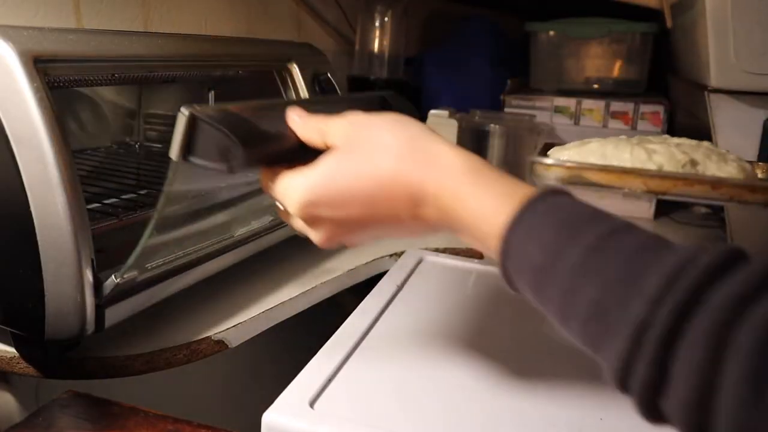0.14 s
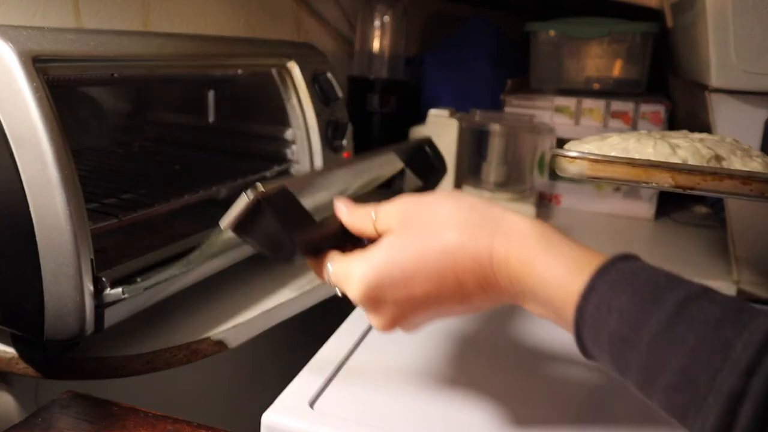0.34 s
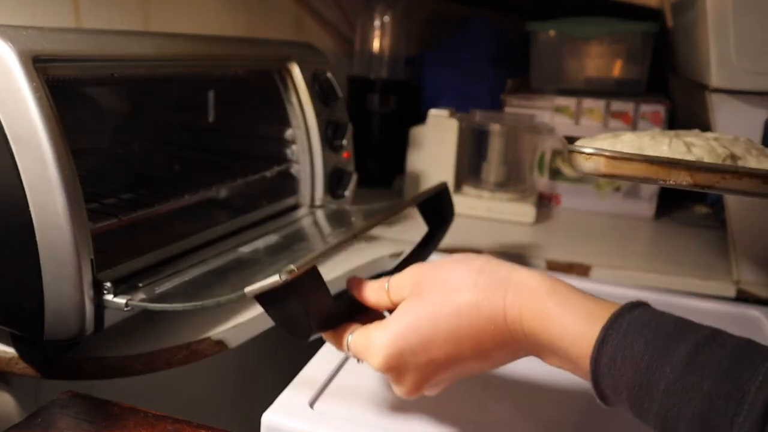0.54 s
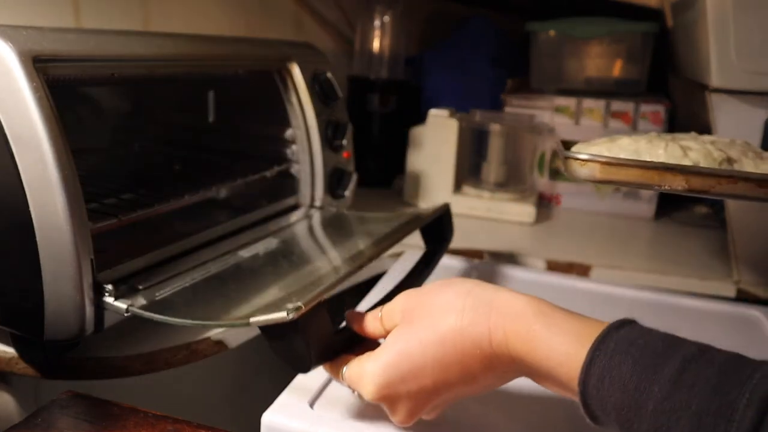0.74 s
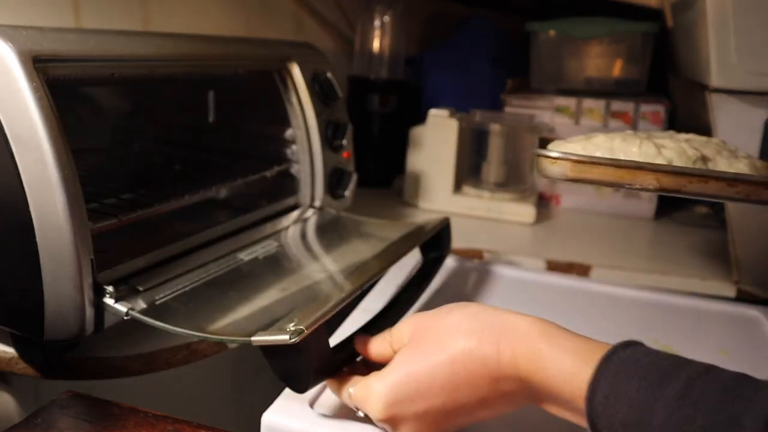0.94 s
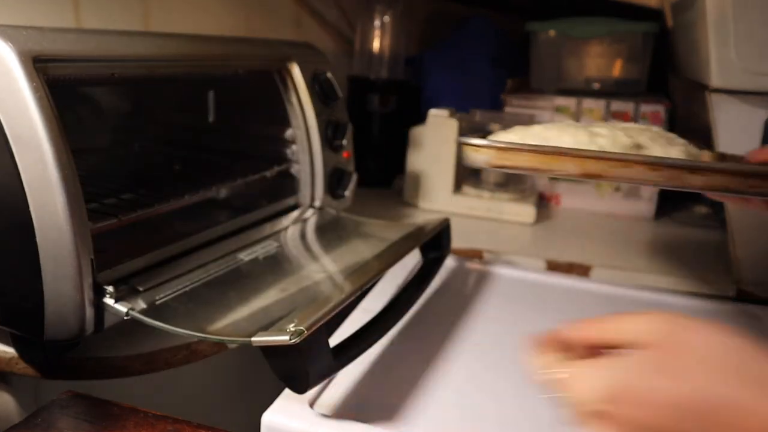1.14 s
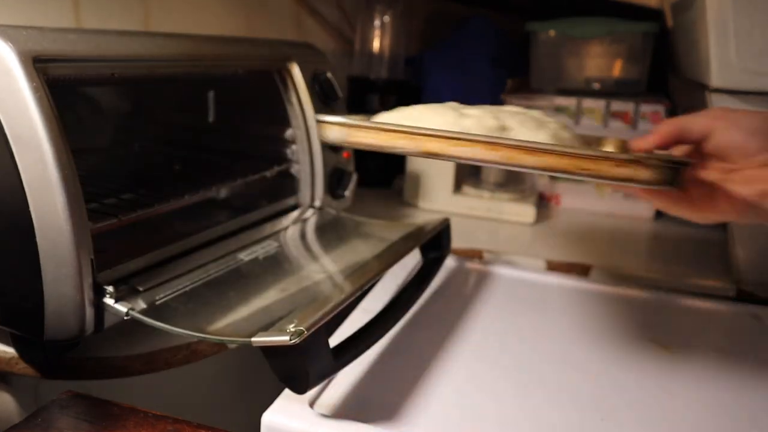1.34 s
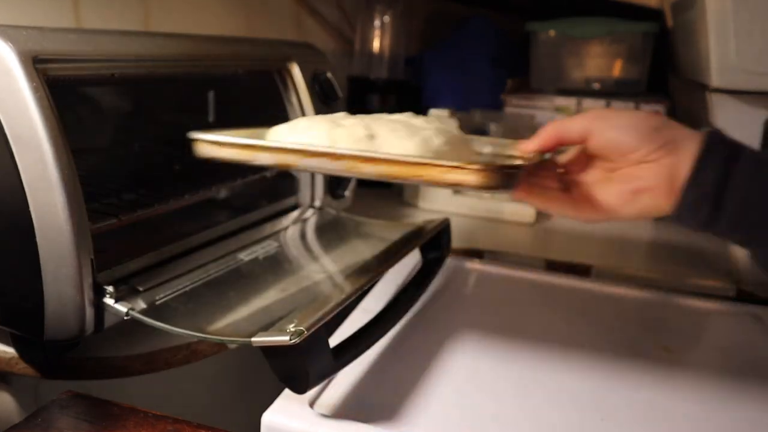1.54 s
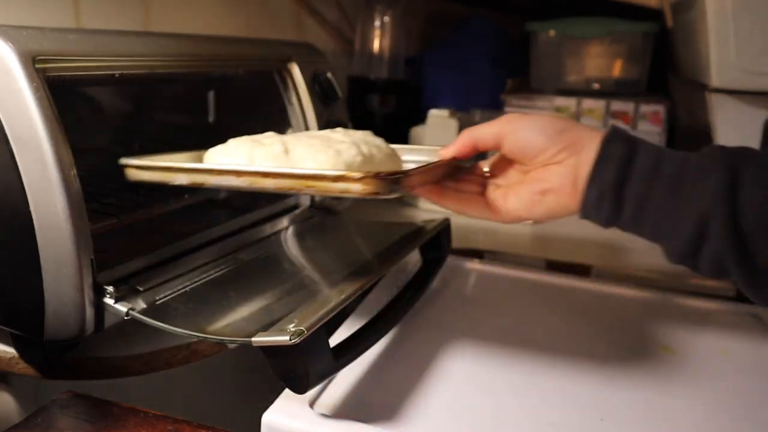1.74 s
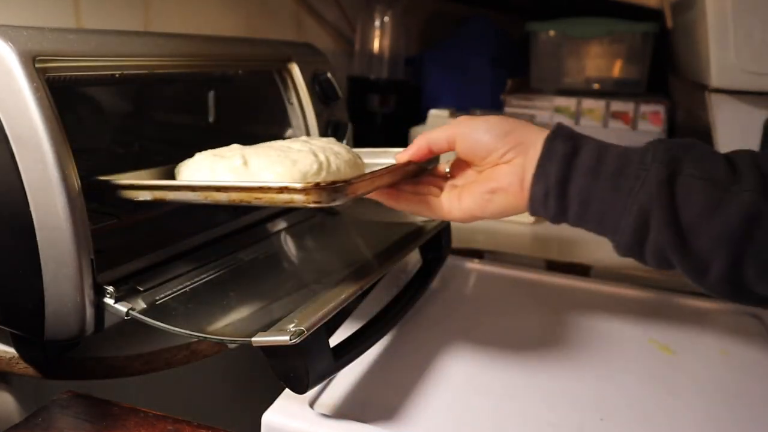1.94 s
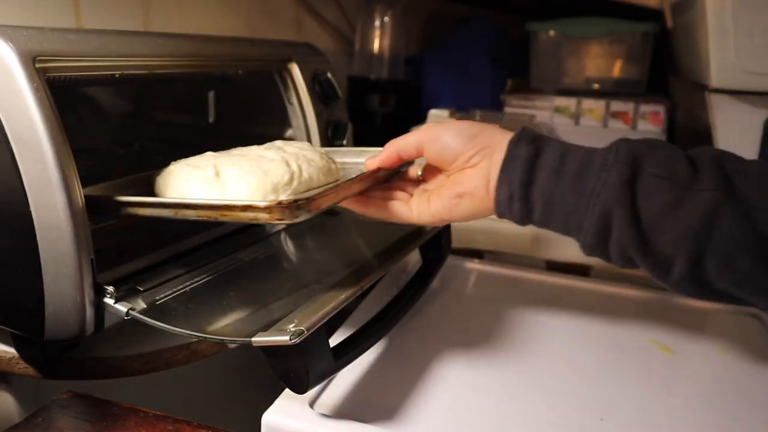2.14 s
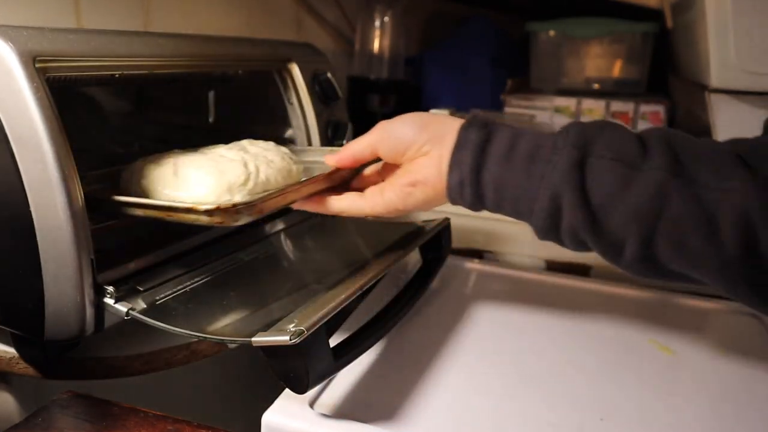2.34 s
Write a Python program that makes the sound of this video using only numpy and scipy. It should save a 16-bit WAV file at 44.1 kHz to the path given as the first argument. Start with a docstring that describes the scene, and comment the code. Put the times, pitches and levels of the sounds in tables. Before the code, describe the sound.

Close up in a small quiet kitchen, an oven door rubs free, creaks and clicks down to a dull thump and dry tap, then after a cloth swish a thin baking tray rattles onto the rack.

```python
"""Toaster oven door and tray

A toaster oven's glass door is pulled down in a small kitchen: its edge rasps free, the hinge grinds,
the spring ticks, the door thumps dully and the handle taps the counter. A sleeve swishes as a metal
tray is fetched; the tray clanks on the wire rack and slides in. Blows and random stick-slip clicks
drive decaying noise bands and resonators; edge, scrape, cloth, air and rumble are shaped noise."""
import sys
import numpy as np
from scipy import signal
from scipy.fft import rfft, irfft
from scipy.io import wavfile

SR = 44100
rng = np.random.default_rng(int(sys.argv[2]) if len(sys.argv) > 2 else 0)


def bounce(signal):
    """Save signal as a 16-bit WAV file at the path given by the first command-line argument."""
    frames = np.transpose(np.atleast_2d(signal))
    limited = np.clip(frames, -1, 1)
    pcm = np.round(limited * 32767).astype(np.int16)
    wavfile.write(sys.argv[1], SR, pcm)


N = 105884
TIME_S = np.arange(N) / SR
FREQS_HZ = np.maximum(np.fft.rfftfreq(N, 1 / SR), 1)

TILT_PIVOT_HZ = 2120  # blow levels hold here; tilt acts either side
RISE_CYCLES, CRACK_S = 2.24, 0.0023  # band onset; energy time constant of the crack
SLIPS_PER_S, SLIP_SPREAD_DB = 150, 4
RIPPLE_DB, RIPPLE_HZ = 4, 31.95  # depth and spacing of minor resonances
SCRAPE_GRAINS_PER_S, SCRAPE_GRAIN_S = 320, 0.0021
AIR_DB = -50.5

# Steady air, spectrum: (frequency [Hz], relative density [dB])
AIR_COLOUR = [(100, -3), (170, -9), (300, -13), (500, -16.5), (1200, -23.5), (3000, -32.5), (5500, -43.5),
              (8000, -54), (12000, -88)]
# Handling rumble: (time [s], level [dB]); (frequency [Hz], relative density [dB])
RUMBLE_LEVEL = [(0, -44), (.3, -48.5), (.42, -45), (.85, -48), (.95, -43.5), (1.18, -45), (1.26, -42),
                (1.51, -42.5), (1.58, -51.5), (2.05, -48), (2.17, -42.5), (2.4, -42)]
RUMBLE_COLOUR = [(20, -7), (40, -3.5), (62, 11.5), (80, 5), (110, -3.5), (170, -6), (300, -31), (1000, -87)]
# Sleeve: (time [s], level [dB]); (frequency [Hz], relative density [dB])
SLEEVE_LEVEL = [(0, -72), (.16, -56), (.33, -59), (1.0, -82), (1.1, -61), (1.2, -56.5), (1.36, -60.5),
                (1.40, -52.5), (1.47, -52.5), (1.58, -54.5), (1.66, -64.5), (2.0, -71)]
SLEEVE_COLOUR = [(300, 6.5), (1000, 5.5), (2500, -0.5), (5500, -4.5), (8000, -12.5), (11000, -6.5),
                 (12500, -12.5), (15500, -31)]

# Tray strikes and chatter on the rack: (time [s], level [dB], tilt [dB/octave])
TRAY_CLANKS = [(2.0075, -26.5, 1), (2.014, -30, 2), (2.056, -38, 2), (2.1495, -27, 5.5), (2.154, -25.5, 1),
               (2.159, -24.5, 0.5), (2.164, -29, 0.5), (2.177, -36, 0), (2.198, -38, 1),
               (2.2976, -47.5, -1), (2.3295, -52.5, 1.5)]
# Tray rubbing on the rack: (time [s], relative force [dB])
TRAY_RUB = [(2.0, -92), (2.03, -38), (2.13, -48), (2.19, -56), (2.25, -43), (2.30, -39.5), (2.35, -39),
            (2.4, -34)]
# Tray, dense ringing: (frequency [Hz], relative density [dB]); (frequency [Hz], t60 [s])
TRAY_COLOUR = [(71, -41), (120, -8.5), (200, -15.5), (306, -5.5), (490, -7.5), (812, -5.5), (1000, -11),
               (1150, -9), (2340, -12.5), (2900, -13.5), (4860, -20), (11900, -27), (15500, -66)]
TRAY_T60 = [(200, 0.62), (1000, 0.35), (3000, 0.23), (10000, 0.084), (16000, 0.078)]
# Tray, clear modes: (frequency [Hz], relative level [dB], t60 [s])
TRAY_MODES = [(243, -10.5, 0.74), (346.5, -8.5, 0.58), (625.5, -12.5, 0.45), (804, -9, 0.38),
              (1112, -3.5, 0.11), (1234, -13, 0.18), (1436, -12, 0.065), (1665, -2.5, 0.11),
              (2236, -5, 0.063), (2423, -14, 0.12), (2880, -18, 0.14), (3795, -12, 0.15), (9750, -9, 0.063)]
# Soft nudge as the tray is lifted clear: (time [s], level [dB], tilt [dB/octave])
TRAY_NUDGES = [(1.51, -43.5, 0)]
# Tray held free, modes: (frequency [Hz], relative level [dB], t60 [s])
FREE_TRAY_MODES = [(529, -11, 0.24), (800, -1, 0.32), (1640, -13, 0.35)]
# Rack wires struck as the tray lands: (time [s], level [dB], tilt [dB/octave])
RACK_PINGS = [(2.009, -32.5, 0)]
# Rack wires, modes: (frequency [Hz], relative level [dB], t60 [s])
RACK_MODES = [(1264, -2, 0.14), (1797, -7, 0.14), (3004, 6.5, 0.11), (3280, -6, 0.14), (5160, -6.5, 0.15),
              (7790, -12, 0.27)]

# Handle on the counter: (time [s], level [dB], tilt [dB/octave])
HANDLE_TAPS = [(1.0267, -27.5, 1)]
# Handle, dense ringing: (frequency [Hz], relative density [dB]); (frequency [Hz], t60 [s])
HANDLE_COLOUR = [(150, 2.5), (500, -1), (740, 3.5), (1000, -8), (1300, -2), (1600, -6), (2000, -3),
                 (2350, -23), (2900, -2.5), (3400, -0.5), (4200, -10), (5200, -22.5), (10000, -24.5),
                 (15000, -58)]
HANDLE_T60 = [(300, 0.095), (1000, 0.095), (3000, 0.03), (10000, 0.035)]
# Handle, clear modes: (frequency [Hz], relative level [dB], t60 [s])
HANDLE_MODES = [(516, -1, 0.073), (717, -9, 0.07), (1180, -4.5, 0.038), (1370, -1.5, 0.03),
                (1820, 4.5, 0.03), (2940, 7, 0.023), (3260, -3, 0.033), (4230, -7, 0.032)]

# Door edge rubbing free of the frame: (time [s], level [dB]); (frequency [Hz], relative density [dB])
EDGE_LEVEL = [(0, -46), (.02, -39), (.048, -38.5), (.07, -40.5), (.095, -48), (.16, -59), (.3, -62)]
EDGE_COLOUR = [(150, -2), (265, 21), (450, 4.5), (600, 2), (1400, -8.5), (1800, 3), (2200, -12.5),
               (2600, 2.5), (2850, -4), (3130, 3), (3500, -4), (6000, -12), (11000, -26), (14000, -55)]
# Hinge arm scraping in its slot: (time [s], level [dB]); (frequency [Hz], relative density [dB])
SCRAPE_LEVEL = [(.34, -87), (.39, -49), (.46, -44), (.56, -50), (.61, -57), (.65, -65), (.72, -96)]
SCRAPE_COLOUR = [(1080, -3), (1205, 9), (1350, -6), (2050, -6), (2500, 3), (2750, -9), (3100, 2.5),
                 (3550, -7), (4050, -4.5), (5200, -3), (7500, -15), (11000, -21), (14000, -61.5)]
# Hinge and spring ticks: (time [s], level [dB], tilt [dB/octave])
HINGE_TICKS = [(.358, -38.5, 0.5), (.375, -42.5, 3.5), (.393, -43, -0.5), (.400, -42, 6), (.412, -45, -2.5),
               (.454, -45.5, 3.5), (.497, -47, 1.5), (.527, -37, 2.5), (.651, -49, 4.5), (.660, -29.5, 1.5),
               (.7535, -39.5, 1.5), (.8435, -34.5, 5.5), (.847, -44.5, -0.5)]
# Dull low door thumps, one during the hinge grind and one near the stop:
# (time [s], level [dB], tilt [dB/octave])
DOOR_THUMPS = [(.567, -42.5, -3.5), (0.865, -46.5, -5)]
# Hinge rubbing: (time [s], relative force [dB])
HINGE_RUB = [(.34, -96), (.37, -37.5), (.46, -39.5), (.51, -47.5), (.56, -39.5), (.63, -52), (.72, -61),
             (.82, -55), (.95, -60), (1.1, -96)]
# Door shell, dense ringing: (frequency [Hz], relative density [dB]); (frequency [Hz], t60 [s])
DOOR_COLOUR = [(71, -23), (120, -18), (166, -1), (200, -10.5), (255, 0), (332, -7.5), (398, -4), (563, -7),
               (764, -7.5), (1060, -11.5), (1190, -12), (1590, -15), (3050, -14), (11200, -31),
               (15500, -58)]
DOOR_T60 = [(200, 0.17), (1000, 0.31), (3000, 0.2), (10000, 0.084), (16000, 0.039)]
# Door shell, clear modes: (frequency [Hz], relative level [dB], t60 [s])
DOOR_MODES = [(504.5, -7.5, 0.22), (780, -11, 0.35), (1072, -10, 0.27), (1717, -10.5, 0.21),
              (1995, -7, 0.086), (2410, -15, 0.2), (2600, -18, 0.25), (3076, -9.5, 0.16),
              (4600, -9.5, 0.11), (4830, -10.5, 0.16), (11100, -16.5, 0.069)]
# Glass pane, modes: (frequency [Hz], relative level [dB], t60 [s])
PANE_MODES = [(170, 0.5, 0.38), (233.4, -2.5, 0.37), (257.5, 5.5, 0.56), (300.5, -5, 0.39),
              (392.3, 0, 0.41), (435, -0.5, 0.16), (1188, -8, 0.17), (1207, -2.5, 0.45)]
# Casing taking the door's weight: (time [s], level [dB], tilt [dB/octave])
CASING_THUDS = [(.888, -38, 0)]
# Casing, modes: (frequency [Hz], relative level [dB], t60 [s])
CASING_MODES = [(167, 0, 0.39), (242, -4, .3), (334.5, -4, 0.28)]

# Stereo width of oven, handle and air: (frequency [Hz], side minus mid [dB])
OVEN_WIDTH = [(100, -31), (300, -15.5), (700, -7.5), (1400, -1.5), (2800, 3), (5500, 4), (10000, 7.5)]
HANDLE_WIDTH = [(300, -12), (1400, -5), (3000, 0), (6000, 6), (10000, 5)]
AIR_WIDTH = [(60, -35), (150, -9.5), (300, 0), (700, 3), (2500, 5.5), (6000, 7.5), (10000, 9)]


def amp(db):
    """Decibels to gain."""
    return 10 ** (np.asarray(db) / 20)


def in_time(rows):
    """A (time, value) curve at every sample."""
    return np.interp(TIME_S, *np.transpose(rows))


def at_hz(points, hz):
    """A (frequency, value) table read on a log-frequency axis."""
    table_hz, value = np.transpose(points)
    return np.interp(np.log(hz), np.log(table_hz), value)


def noise(colour, gate=1):
    """Two unrelated noises, gated, then coloured; near unit rms for a gate of unit mean power."""
    low_cut = np.minimum(FREQS_HZ / colour[0][0], 1) ** 2
    gain = amp(at_hz(colour, FREQS_HZ)) * low_cut
    gain /= np.sqrt(np.mean(gain ** 2))
    white = rng.standard_normal((2, N)) * gate
    return irfft(rfft(white) * gain, N)


def ripple():
    """Uneven fine comb of a body's minor resonances; mean power 1."""
    grid_hz = np.arange(3000) * RIPPLE_HZ
    heights = np.clip(rng.standard_normal(len(grid_hz)), -2, 2)
    depth_db = RIPPLE_DB * np.minimum(FREQS_HZ / 1000, 1)  # shallower below 1 kHz
    gain = amp(depth_db * np.interp(FREQS_HZ, grid_hz, heights))
    return gain / np.sqrt(np.mean(gain ** 2))


def stereo(pair, width, direct):
    """Close microphone ports: side is part direct, a quarter cycle ahead, and part diffuse."""
    mid, diffuse = rfft(pair)
    mix = 1j * direct * mid + np.sqrt(1 - direct ** 2) * diffuse
    side = irfft(amp(at_hz(width, FREQS_HZ)) * mix, N)
    return np.array([pair[0] + side, pair[0] - side])


def fade(x, seconds):
    """Every input leaves an exponential tail of its own height."""
    return signal.lfilter([1], [1, -np.exp(-1 / (seconds * SR))], x + 1e-18)  # offset avoids denormals


def slips(force, level_db):
    """Stick-slip: a random stream of uneven clicks under a force curve."""
    clicks = (rng.random(N) < SLIPS_PER_S / SR) * rng.choice([-1, 1], N)
    spread_db = SLIP_SPREAD_DB * np.clip(rng.standard_normal(N), -2, 2)
    return clicks * amp(in_time(force) + level_db + spread_db)


def contacts(blows, rub, rub_tilt_db, hz):
    """Blows and slips as a click train, at their strength at one frequency."""
    octaves = np.log2(hz / TILT_PIVOT_HZ)
    clicks = rub * amp(rub_tilt_db * octaves)
    for time_s, level_db, tilt_db in blows:
        clicks[int(time_s * SR)] += amp(level_db + tilt_db * octaves)
    return clicks


def ringing(blows, rub, rub_tilt_db, modes):
    """Clear modes: two-pole resonators, struck with a random sign at every contact."""
    out = np.zeros((2, N))
    for hz, level_db, t60_s in modes:
        radius = amp(-60 / (t60_s * SR))
        angle = 2 * np.pi * hz / SR
        clicks = contacts(blows, rub, rub_tilt_db, hz) * rng.choice([-1, 1], (2, N))
        poles = [1, -2 * radius * np.cos(angle), radius ** 2]
        out += amp(level_db) * signal.lfilter([0, np.sin(angle)], poles, clicks + 1e-18)
    return out


def body(blows, rub, colour, decay, modes, rub_tilt_db, modes_db, crack_db, room_db, room_t60_s):
    """Struck body: clear modes, plus a crack, dense ringing and room tail decaying band by band."""
    out = amp(modes_db) * ringing(blows, rub, rub_tilt_db, modes)
    dense = rfft(noise(colour)) * ripple()
    t60_to_tau = 1 / np.log(10 ** 6)  # energy time constant per t60
    for hz in 125 * 2 ** (np.arange(15) / 2):
        # triangular half-octave-spaced bands
        window = np.maximum(1 - 2 * abs(np.log2(FREQS_HZ / hz)), 0)
        band = irfft(dense * window, N)
        energy = contacts(blows, rub, rub_tilt_db, hz) ** 2
        power = fade(energy, at_hz(decay, hz) * t60_to_tau)
        power += amp(crack_db) ** 2 * fade(energy, CRACK_S)
        power += amp(room_db) ** 2 * fade(energy, room_t60_s * t60_to_tau)
        rise_s = RISE_CYCLES / hz
        softened = fade(power, rise_s) * (1 - np.exp(-1 / (rise_s * SR)))
        out += band * np.sqrt(softened)
    return out


def kitchen():
    """Steady air noise and a low handling rumble of varying level."""
    air = noise(AIR_COLOUR) * amp(AIR_DB)
    rumble = noise(RUMBLE_COLOUR) * amp(in_time(RUMBLE_LEVEL))
    return stereo(air + rumble, AIR_WIDTH, direct=0)


def sleeve():
    """Cloth swish as the arm moves: coloured noise under a level curve."""
    swish = noise(SLEEVE_COLOUR) * amp(in_time(SLEEVE_LEVEL))
    return stereo(swish, AIR_WIDTH, direct=0)


def tray():
    """Sheet metal rings softly in the hand, then lands, chatters and slides on pinging rack wires."""
    rub = slips(TRAY_RUB, level_db=-12.0)
    metal = body(TRAY_CLANKS, rub, TRAY_COLOUR, TRAY_T60, TRAY_MODES,
                 rub_tilt_db=0, modes_db=-3.5, crack_db=-0.5, room_db=-23.0, room_t60_s=0.83)
    lifted = ringing(TRAY_NUDGES, np.zeros(N), 0, FREE_TRAY_MODES)
    rack = ringing(RACK_PINGS, np.zeros(N), 0, RACK_MODES)
    return stereo(metal + lifted + rack, OVEN_WIDTH, direct=0.45)


def handle():
    """One dry plastic tap on the counter: short, well-damped ringing."""
    tap = body(HANDLE_TAPS, np.zeros(N), HANDLE_COLOUR, HANDLE_T60, HANDLE_MODES,
               rub_tilt_db=0, modes_db=-5.0, crack_db=-13, room_db=-13.5, room_t60_s=0.19)
    return stereo(tap, HANDLE_WIDTH, direct=0.085)


def door_edge():
    """Short raspy rub as the door leaves its frame: noise through fine resonances."""
    rub = irfft(rfft(noise(EDGE_COLOUR)) * ripple(), N)
    return stereo(rub * amp(in_time(EDGE_LEVEL)), OVEN_WIDTH, direct=0.25)


def hinge_scrape():
    """Hinge arm drags in its slot: dense tiny slips excite resonances and merge into a rough rub."""
    grains = (rng.random(N) < SCRAPE_GRAINS_PER_S / SR) * rng.exponential(1, N)
    power = fade(grains, SCRAPE_GRAIN_S)
    gate = np.sqrt(power / power.mean())
    rub = irfft(rfft(noise(SCRAPE_COLOUR, gate)) * ripple(), N)
    return stereo(rub * amp(in_time(SCRAPE_LEVEL)), OVEN_WIDTH, direct=0.45)


def door():
    """Hinge grind, ticks and dull thumps ring the shell; the grind hums the pane; the casing thuds."""
    grind = slips(HINGE_RUB, level_db=-11.5)
    shell = body(HINGE_TICKS + DOOR_THUMPS, grind, DOOR_COLOUR, DOOR_T60, DOOR_MODES,
                 rub_tilt_db=-2.0, modes_db=-6.5, crack_db=-2, room_db=-15, room_t60_s=0.35)
    pane = amp(-2.0) * ringing([], grind, 0, PANE_MODES)
    casing = ringing(CASING_THUDS, np.zeros(N), 0, CASING_MODES)
    return stereo(shell + pane + casing, OVEN_WIDTH, direct=0.36)


def scene():
    """All sources at the microphone."""
    background = kitchen() + sleeve()
    return background + tray() + handle() + door_edge() + hinge_scrape() + door()


def record(dry):
    """Steep elliptic low-pass at 16 kHz."""
    lowpass = signal.ellip(10, 0.1, 80, 16000, fs=SR, output="sos")  # 0.1 dB ripple, 80 dB stop
    return signal.sosfilt(lowpass, dry)


dry = scene()
out = record(dry)
bounce(out)
```